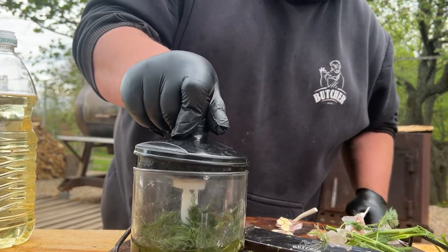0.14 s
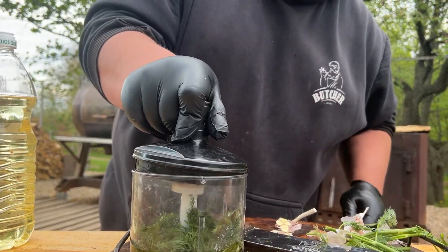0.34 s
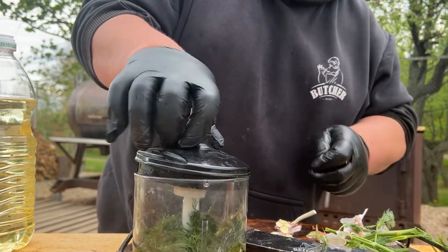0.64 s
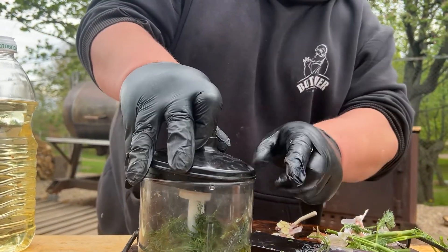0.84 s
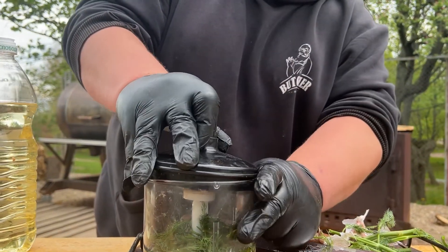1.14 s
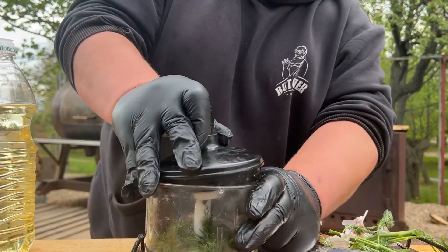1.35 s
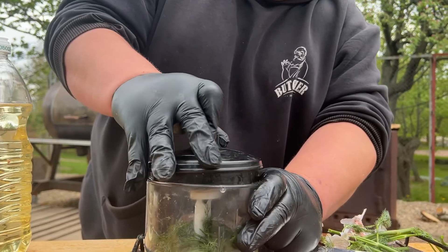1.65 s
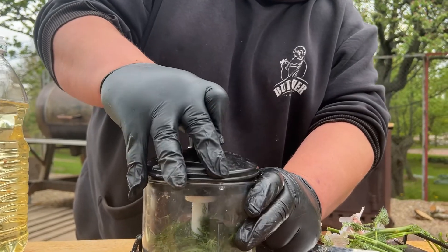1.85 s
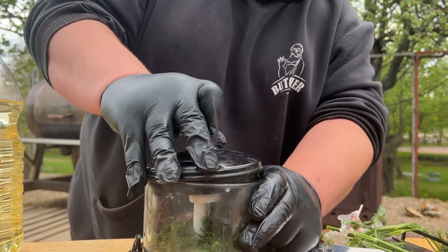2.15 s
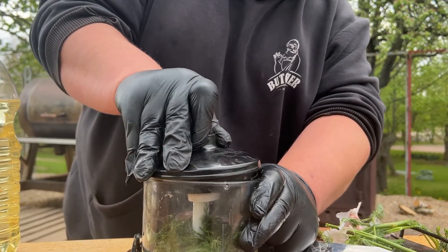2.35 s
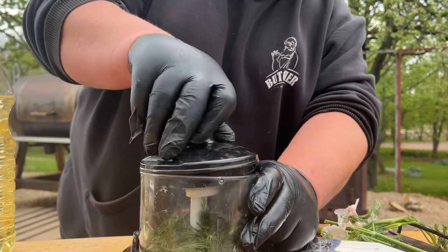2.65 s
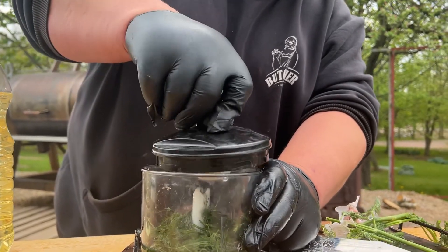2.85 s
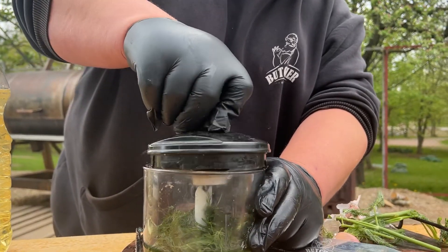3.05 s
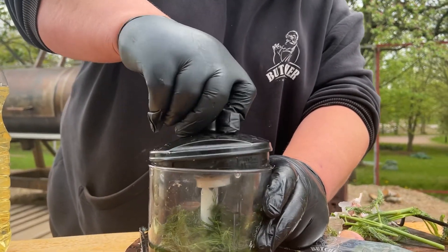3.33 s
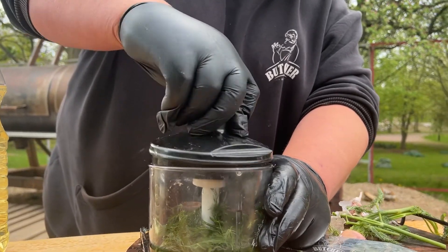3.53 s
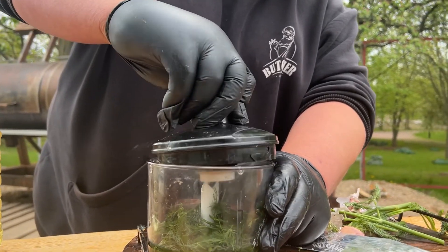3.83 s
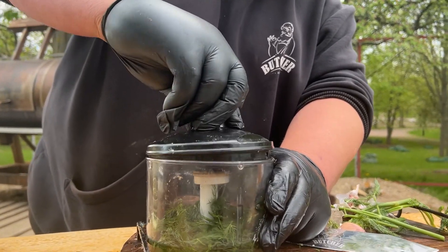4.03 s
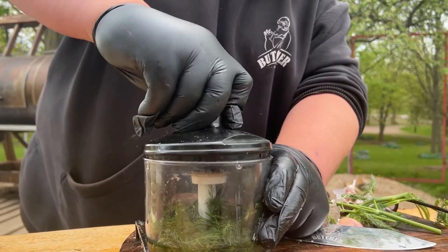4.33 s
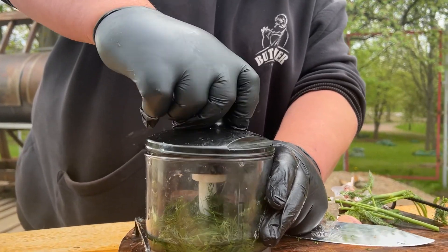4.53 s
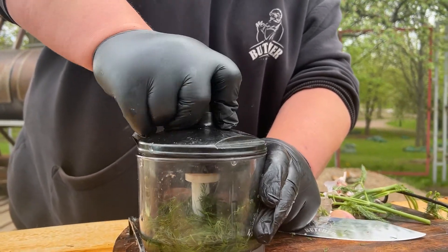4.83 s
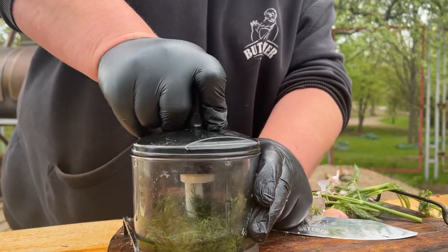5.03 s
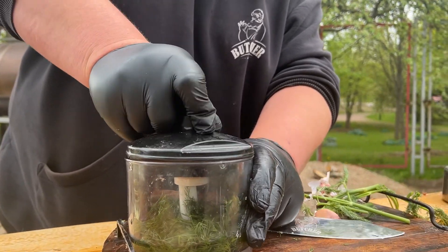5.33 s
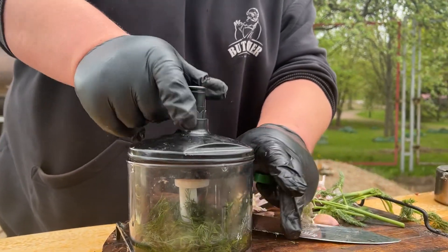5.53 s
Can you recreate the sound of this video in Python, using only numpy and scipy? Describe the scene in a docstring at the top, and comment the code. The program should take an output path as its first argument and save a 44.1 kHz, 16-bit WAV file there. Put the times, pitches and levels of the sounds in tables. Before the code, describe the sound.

Outdoors, low wind rumbles on the microphone throughout, with a brief gust near 0.5 seconds and a faint wash of distant traffic. Close by, rubber gloves rustle and tick softly. At 1 second a plastic lid clacks firmly on the bowl of a small hand chopper, followed by a cluster of hollow knocks around 1.3 to 1.5 seconds. Lighter taps and quiet rubbing follow, with a soft knock at 2 seconds. From about 2.8 to 3.9 seconds the lid rattles and scrapes unevenly on the rim, each bump ringing briefly in the bowl, with a tiny squeak near 3 seconds and a louder clatter at 3.9. Two firm clacks land at about 4.2 and 4.5 seconds, then a lighter tap and a sharp, bright click at 4.8. Faint glove snaps and a short rub finish at around 5.5 seconds. The handling sounds are nearly dry.

```python
"""A plastic lid knocks and scrapes on the bowl of a small hand chopper as gloved hands fit it, close by.
Each impact excites the damped modes of the plastic and the air cavity of the bowl, which resonates at a
pitch set by the gap. Friction makes the rim squeak and the rubber gloves hiss, with a few sharp clicks.
Nearby surfaces add brief reflections; outdoors, low wind rumbles over a distant wash of traffic."""
import sys
import numpy as np
from scipy import signal
from scipy.fft import rfft, irfft
from scipy.io import wavfile
from scipy.ndimage import uniform_filter1d

SR = 44100
rng = np.random.default_rng(int(sys.argv[2]) if len(sys.argv) > 2 else 0)


def to_wav(s):
    """Save 16-bit WAV."""
    ch = np.atleast_2d(s).T  # columns
    pcm = np.round(np.clip(ch, -1, 1) * 32767)  # PCM
    wavfile.write(sys.argv[1], SR, pcm.astype(np.int16))


N = 250488

# spectrum of dull friction on lid and rim: frequency_hz, density_db
DRAG_SPECTRUM = [(900, 12), (1500, 16.5), (2050, -2), (2700, 13.5), (4500, 4.5), (6300, 2), (7200, -17),
                 (9000, -4.5), (11000, -50)]


def lid(ring_cycles=11.2, overtone_ratio=1.704, overtone_db=-8, grain_db=-3.0, shake=2.9,
        thump_db=-8, crunch_db=-11):
    """Impact excitation: each rough contact drives the shell, a treble crack and the cavity resonance."""
    # lid against bowl: start_s, shell_db, cavity_pitch_hz, cavity_db, treble_db, contact_s
    knocks = [(0.081, -38, 447, -23, -52, 0.0066), (0.453, -44, 282, -21, -64, 0.0033),
              (0.733, -42, 297, -24, -36.5, 0.0031), (1.021, -5, 313, -3.5, -17.5, 0.0025),
              (1.326, -22, 377, -14.5, -29, 0.0065), (1.3338, -6.5, 412, -8, -14, 0.0038),
              (1.338, -18, 500, -17.5, -23.5, 0.0099), (1.356, -30.5, 564, -23.5, -58, 0.01),
              (1.465, -30, 466, -18, -34, 0.0078), (1.476, -12.5, 485, -2, -25, 0.0046),
              (1.4861, -13.5, 476, -6, -26.5, 0.0072), (1.56, -24.5, 467, -10.5, -37, 0.002),
              (1.661, -33.5, 448, -35, -58, 0.0027), (1.7165, -36.5, 443, -40, -44, 0.0037),
              (1.749, -24, 438, -24, -34, 0.0094), (2.038, -26, 542, -18, -55, 0.009),
              (2.049, -22.5, 274, -6, -44, 0.0027), (2.775, -25, 473, -28, -28, 0.0091),
              (2.784, -23, 698, -26, -33, 0.016), (2.886, -29, 317, -19.5, -31, 0.0013),
              (2.902, -23, 600, -9, -50, 0.0018), (2.938, -23, 557, -10.5, -42, 0.0024),
              (2.983, -26.5, 540, -11, -31, 0.0037), (2.992, -29, 470, -22.5, -45, 0.018),
              (3.048, -34, 502, -15.5, -51, 0.005), (3.059, -50, 540, -9.5, -43, 0.0095),
              (3.073, -20.5, 548, -4, -53, 0.011), (3.093, -34, 522, -15, -53, 0.013),
              (3.188, -22.5, 478, -1.5, -50, 0.0058), (3.198, -15.5, 575, -9, -25, 0.0049),
              (3.22, -20.5, 453, -4.5, -36, 0.0032), (3.237, -32, 318, -18.5, -33, 0.0034),
              (3.447, -30.5, 460, -18.5, -39, 0.0023), (3.458, -39, 448, -20.5, -59, 0.018),
              (3.497, -29, 500, -17, -42, 0.0077), (3.516, -26.5, 493, -8.5, -44, 0.011),
              (3.534, -20.5, 514, -3, -33, 0.0092), (3.547, -16.5, 431, 0, -39, 0.0013),
              (3.598, -32, 470, -24.5, -48, 0.0056), (3.688, -14, 540, -12, -20, 0.0035),
              (3.693, -23, 490, -6, -46, 0.0038), (3.7, -25.5, 570, -15.5, -39, 0.01),
              (3.829, -30, 543, -7.5, -45, 0.0085), (3.867, -26, 460, -16, -43, 0.0032),
              (3.876, -18.5, 562, -7, -28, 0.0059), (3.886, -9, 460, -8, -38, 0.0016),
              (3.901, -14, 706, -10.5, -25, 0.011), (3.906, -13.5, 419, -17, -20, 0.0067),
              (3.926, -26, 460, -16.5, -38, 0.0071), (4.01, -41, 300, -20, -68, 0.0036),
              (4.1542, -8.5, 278, -13, -15, 0.0054), (4.317, -35.5, 824, -18.5, -40, 0.004),
              (4.4618, -4.5, 275, -8.5, -29, 0.0032), (4.662, -21.5, 270, -14.5, -28, 0.0031),
              (4.841, -18, 1110, -22, -25, 0.0033)]
    # the tipping lid favours the upper or the lower clack mode: time_s, upper_over_lower_db
    lean = [(1.02, -3), (1.48, -4), (2.79, 6), (2.94, -13), (2.99, 5), (3.5, -4), (3.69, 5), (3.9, -12.5),
            (4.156, -15), (4.462, 7), (4.836, 1)]
    # treble spectrum of a contact: frequency_hz, density_db
    crack_spectrum = [(3500, 12), (6000, 11), (7000, 10), (12000, 10.5), (15500, -3.5), (16700, -33)]
    wall, crunch, crack, air = np.zeros((4, N))
    t = np.arange(3000) / SR
    for s, shell_db, hz, cavity_db, treble_db, contact_s in knocks:
        noise, grain, jolt, place = rng.standard_normal((4, len(t)))
        u = t / (0.48 * np.clip(contact_s, 5e-4, .02))
        force = u ** 2 * np.exp(2 - 2 * u)  # the contact builds up and lets go
        burst = noise * force * amp(grain_db * unit_rms(uniform_filter1d(grain, 30)))
        lean_db = np.interp(s, *np.transpose(lean))
        add(wall, s, amp(shell_db) * shell(burst, place, lean_db))
        add(crack, s, amp(treble_db) * burst)
        add(crunch, s, amp(shell_db + crunch_db) * burst)
        cycles = hz * (t + 0.000378 * (1 - np.exp(-t / 0.00017)))  # pitch settles as the gap closes
        decay = amp(-60 * cycles / ring_cycles)
        swing = signal.fftconvolve(force * (1 + shake * jolt), decay)[:len(t)]  # roughness shakes the ring
        overtone = amp(overtone_db) * decay * np.sin(2 * np.pi * overtone_ratio * cycles)
        tone = np.sin(2 * np.pi * cycles) + overtone
        thump = amp(thump_db) * force * jolt  # the pitchless part of the blow
        add(air, s, amp(cavity_db) * (tone * swing / abs(swing).max() + thump))
    inertia = signal.butter(4, 1700, fs=SR, output="sos")  # the air mass answers only slow pushes
    air = signal.sosfilt(inertia, air)
    return wall + colour(crunch, DRAG_SPECTRUM) + colour(crack, crack_spectrum) + air


def shell(push, place, lean_db, place_db=2.0, detune=0.029, clack_centre_hz=2680, clack_span_hz=800):
    """Modal superposition: damped modes share the energy of a push according to lean and contact place."""
    # modes of the plastic lid and wall: frequency_hz, bandwidth_hz, energy_share_db
    modes = [(735, 320, 5.5), (1150, 450, -10.5), (1760, 120, -16.5), (2560, 117, -3), (2976, 290, 5),
             (4230, 1230, -5), (5460, 930, -9)]
    t = np.arange(1200) / SR
    response = 0
    for (hz, width_hz, db), coupling, bend in zip(modes, place, place[::-1]):
        side = np.sign(hz - clack_centre_hz) * (abs(hz - clack_centre_hz) < clack_span_hz)
        ring = np.exp(-np.pi * width_hz * t) * np.sin(2 * np.pi * hz * (1 + detune * bend) * t)
        mode = signal.fftconvolve(push, ring)
        weight = amp(db + place_db * coupling + lean_db * side / 2)
        response = response + weight * mode / np.linalg.norm(mode)
    return response * np.linalg.norm(push) / np.linalg.norm(response)


def brief_tones(glide_per_s=1.4):
    """Narrow-band vibration: rim squeaks and the short ring of one lid knock, as fuzzy rising tones."""
    # brief pitched tones: start_s, length_s, pitch_hz, level_db
    tones = [(2.976, 0.033, 2800, -26), (2.981, 0.017, 5010, -24.5), (2.984, .012, 4270, -24),
             (3.55, 0.039, 5250, -53), (3.553, .03, 6860, -60), (3.764, 0.033, 4400, -53),
             (3.904, 0.013, 1584, -11)]
    out = np.zeros(N)
    for s, length_s, hz, db in tones:
        t = np.arange(int(length_s * SR)) / SR
        fuzz = 0.98 + unit_rms(uniform_filter1d(rng.standard_normal(4000), 90))[:len(t)]
        tone = np.sin(2 * np.pi * hz * t * (1 + glide_per_s * t / 2))
        add(out, s, amp(db) * fuzz * np.hanning(len(t)) * tone)
    return out


def gloves(flicker_db=2.5, slip_share_db=-8, dull_click_db=-3):
    """Friction noise of rubber on plastic: a thin hiss and a duller drag; the clicks share their colour."""
    # spectrum of the glove hiss: frequency_hz, density_db
    hiss_spectrum = [(5500, -25), (7500, 0.5), (9000, -0.5), (10300, -3.5), (11900, 6), (15100, -2),
                     (16100, 6.5), (16500, -29)]
    slips = amp(slip_share_db) * micro_slips()
    hiss, drag = (rng.standard_normal(N) * amp(flicker_db * drift(0.015)) + slips for _ in range(2))
    clicks = sharp_clicks()
    hiss = colour(rubbing_level(column=1) * unit_rms(hiss) + clicks, hiss_spectrum)
    drag = colour(rubbing_level(column=2) * unit_rms(drag) + amp(dull_click_db) * clicks, DRAG_SPECTRUM)
    return patchy(hiss + drag, depth_db=2.2)


def rubbing_level(column, swell_db=9.5, grip_s=0.021, release_s=0.006):
    """Friction envelope (column 1 hiss, 2 drag): strokes bite, swell and let go over a resting rustle."""
    # faint rustle of the resting grip: time_s, hiss_db, drag_db
    rustle = [(0, -71, -75), (.38, -74, -66), (.5, -54, -54.5), (.9, -61.5, -59.5), (1.3, -56, -49),
              (1.55, -73, -58), (1.7, -63, -59), (1.95, -71, -71), (2.1, -59, -53.5), (2.55, -60.5, -54),
              (2.9, -57.5, -52.5), (3.15, -71, -56), (3.4, -60, -62.5), (3.78, -67, -51),
              (4.05, -69, -58.5), (4.22, -57, -53), (4.75, -64.5, -56.5), (5.2, -60.5, -56.5),
              (5.68, -65, -55)]
    # strokes of glove or rim: let_go_s, length_s, hiss_db, drag_db
    strokes = [(0.138, 0.036, -63, -54.5), (0.578, 0.083, -53, -50.5), (0.661, 0.079, -43, -45.5),
               (0.733, 0.053, -57, -49), (0.828, 0.042, -55, -75), (1.138, 0.047, -49, -53.5),
               (1.635, 0.029, -49, -49), (1.776, 0.046, -58, -44), (2.676, 0.085, -49, -42.5),
               (2.715, 0.036, -57, -58), (2.888, 0.043, -49, -55), (3.067, 0.041, -59, -35.5),
               (3.262, .05, -47, -53), (3.416, 0.16, -78, -44.5), (3.546, 0.17, -57, -47),
               (3.834, 0.028, -61, -46), (4.365, 0.031, -47, -51), (5.068, 0.081, -48, -74),
               (5.49, 0.11, -45, -38.5)]
    level = amp(curve(rustle, column))
    for let_go_s, length_s, *levels_db in strokes:
        t = np.arange(-length_s, .05, 1 / SR)
        bite = np.minimum((t + length_s) / grip_s, 1)
        swell = amp(swell_db * np.minimum(t, 0) / length_s)
        release = np.exp(-np.maximum(t, 0) / release_s)
        add(level, let_go_s - length_s, amp(levels_db[column - 1]) * bite * swell * release)
    return level


def sharp_clicks(rise_s=0.00095):
    """Broadband transients: glove snaps and the crack of the last lid knock, each a pulse of noise."""
    # short sharp clicks: start_s, level_db
    clicks = [(0.402, -31.5), (0.646, -30), (0.6552, -21.5), (2.6518, -23.5), (3.039, -35), (3.342, -39),
              (3.494, -27), (3.8193, -34), (4.3824, -30), (4.8375, -4), (5.0132, -25.5), (5.0613, -27.5),
              (5.1016, -36), (5.386, -28.5), (5.449, -27.5)]
    out = np.zeros(N)
    u = np.arange(800) / SR / rise_s
    for s, db in clicks:
        click = rng.standard_normal(len(u)) * u * np.exp(-u)
        add(out, s, amp(db) * click / abs(click).max())
    return out


def micro_slips(slips_per_s=350, spread_db=2.5, damping_radians=6, pitches=8):
    """A Poisson process of tiny rubber slips, each a damped tick at one of several pitches."""
    occurs = rng.random(N) < slips_per_s / SR
    impulses = occurs * amp(spread_db * np.minimum(rng.exponential(1, N), 4))
    pitch_index = rng.integers(0, pitches, N)
    t, out = np.arange(200) / SR, np.zeros(N)
    for k, hz in enumerate(np.geomspace(4000, 14000, pitches)):
        phase = 2 * np.pi * hz * t
        tick = np.sin(phase) * hz * t * np.exp(-phase / damping_radians) * np.sqrt(hz)
        out += signal.oaconvolve(impulses * (pitch_index == k), tick)[:N]
    return unit_rms(out)


def reflections(x, echo_db=-17, t60_s=.07):
    """Early reflections from a board, a bottle and the body behind join the direct sound."""
    t = np.arange(4000) / SR
    taps = rng.standard_normal(len(t)) * (rng.random(len(t)) < .05)
    taps = taps * amp(-60 * t / t60_s) * (t > .001)
    return x + amp(echo_db) * signal.oaconvolve(x, taps / np.linalg.norm(taps))[:N]


def wind(lumpy_db=2.0):
    """Turbulent pressure on the microphone: a lumpy low rumble that follows the gusts."""
    # strength of the wind: time_s, level_db
    gusts = [(0, -25.5), (.38, -21.5), (.47, -12), (.58, -22.5), (1.5, -25.5), (2.4, -23.5), (3.6, -25),
             (4.9, -27.5), (5.2, -24.5), (5.68, -23)]
    # spectrum of the rumble: frequency_hz, density_db
    wind_spectrum = [(18, -71), (45, 0), (65, 4.5), (156, -11), (194, -16), (300, -22), (400, -48.5)]
    rumble = unit_rms(colour(rng.standard_normal(N), wind_spectrum))
    steady = rumble / np.sqrt(uniform_filter1d(rumble ** 2, int(.08 * SR)) + 1.1)  # evens out the lulls
    return steady * amp(curve(gusts) + lumpy_db * drift(0.081))


def traffic(level_db=-38.5, swell_db=1.98):
    """Incoherent summation: distant traffic merges into one gently wavering band of noise."""
    # spectrum of the far wash: frequency_hz, density_db
    wash_spectrum = [(120, -28), (200, -7.5), (300, -10.5), (447, -8.5), (940, -4), (1750, -12),
                     (2360, -20.5), (7000, -57.5), (9500, -75)]
    wash = unit_rms(colour(rng.standard_normal(N), wash_spectrum))
    return wash * amp(level_db + swell_db * drift(0.047))


def patchy(x, depth_db):
    """Time-frequency modulation: random patches of a few kHz by tens of ms swell and sink."""
    spectra = signal.stft(x, nperseg=256, noverlap=192)[2]
    patches = uniform_filter1d(rng.standard_normal(spectra.shape[::-1]), 10, axis=0)
    patches = unit_rms(uniform_filter1d(patches, 20, axis=1))
    return signal.istft(spectra * amp(depth_db * patches.T), nperseg=256, noverlap=192)[1][:N]


def colour(x, spectrum):
    """Spectral shaping by (frequency_hz, density_db) rows, with unit gain for white noise."""
    hz, db = np.transpose(spectrum)
    gain = amp(np.interp(np.log(np.fft.rfftfreq(N, 1 / SR) + 1), np.log(hz + 1), db, -120, -120))
    return irfft(rfft(x) * unit_rms(gain), N)


def drift(seconds):
    """Low-pass noise of rms 1, correlated over about the given time."""
    span = max(int(seconds * SR), 1)
    return unit_rms(uniform_filter1d(uniform_filter1d(rng.standard_normal(N), span), span))


def curve(rows, column=1):
    """Linear interpolation of one column of (time_s, ...) rows, one value a sample."""
    columns = np.transpose(rows)
    return np.interp(np.arange(N) / SR, columns[0], columns[column])


def add(mix, start_s, sound):
    """Superposes a sound on the mix from start_s on."""
    part = mix[round(start_s * SR):][:len(sound)]
    part += sound[:len(part)]


def amp(db):
    """Decibels to amplitude ratio."""
    return 10 ** (np.asarray(db) / 20)


def unit_rms(x):
    """Normalises to rms 1."""
    return x / np.sqrt(np.mean(x ** 2) + 1e-20)


def scene():
    """Superposition in mono: the near lid and gloves with their reflections, over wind and traffic."""
    return (reflections(lid() + brief_tones() + gloves()) + wind() + traffic())[None]


def record(dry, cutoff_hz=16100):
    """Soft saturation rounds the peaks; a low-pass filter then limits the band."""
    limited = 0.84 * np.tanh(dry / 0.81)
    low_pass = signal.firwin(511, cutoff_hz, window=("kaiser", 9), fs=SR)
    return signal.oaconvolve(limited, low_pass[None], "same")


dry = scene()
out = record(dry)
to_wav(out)
```